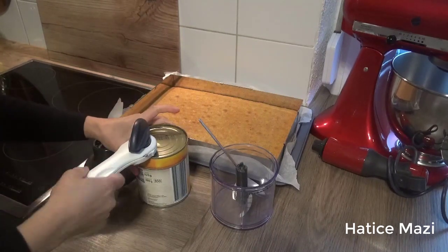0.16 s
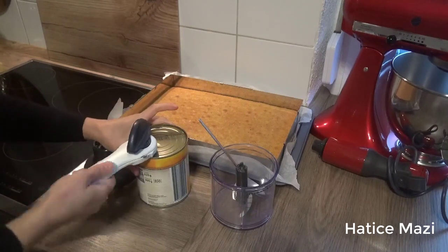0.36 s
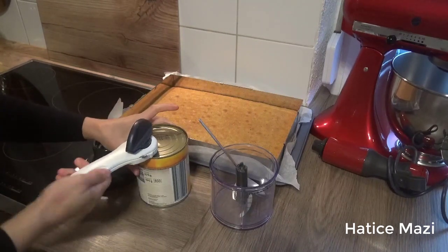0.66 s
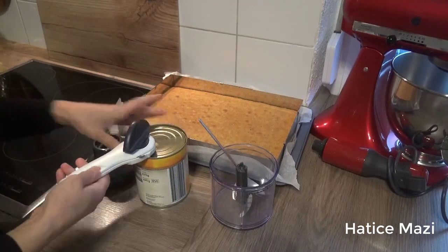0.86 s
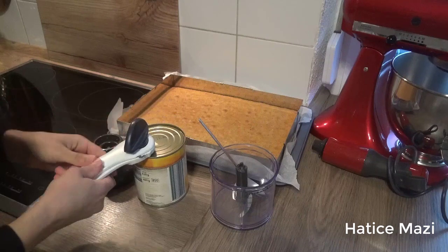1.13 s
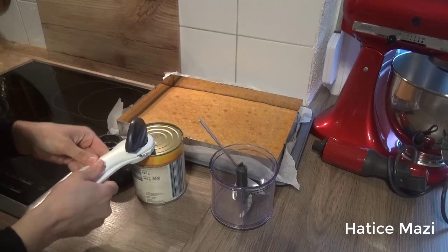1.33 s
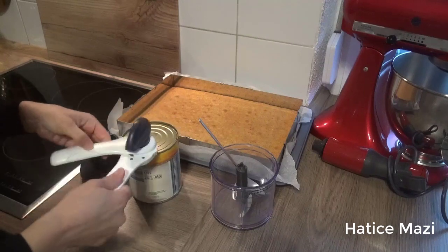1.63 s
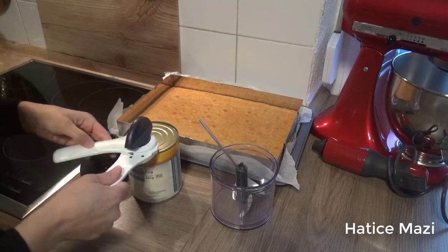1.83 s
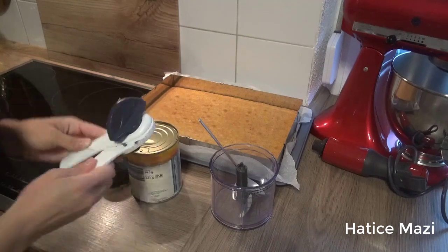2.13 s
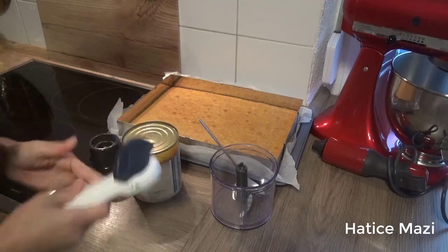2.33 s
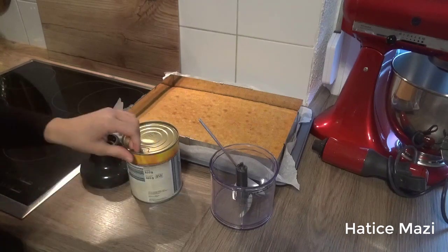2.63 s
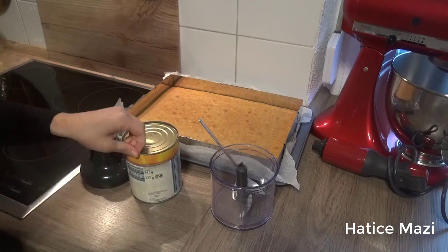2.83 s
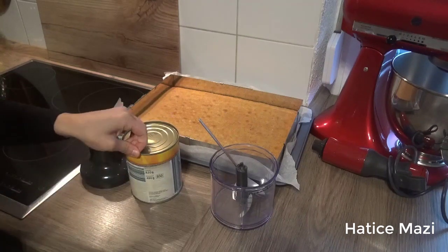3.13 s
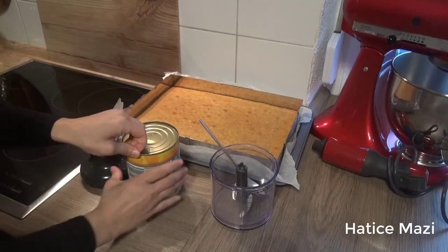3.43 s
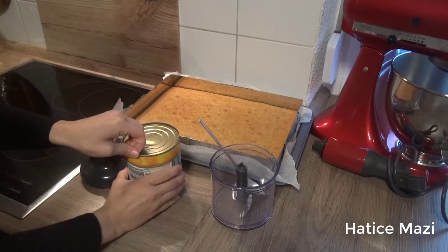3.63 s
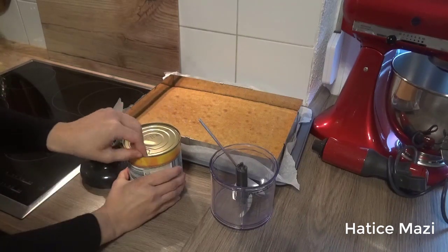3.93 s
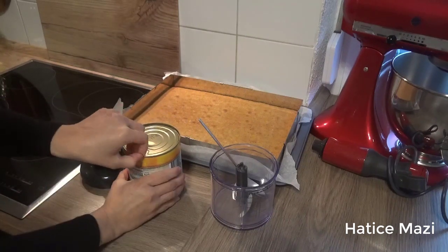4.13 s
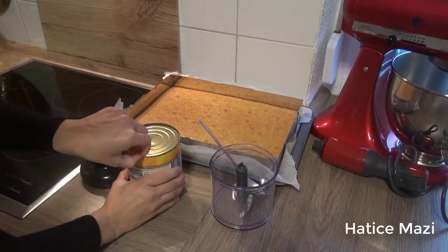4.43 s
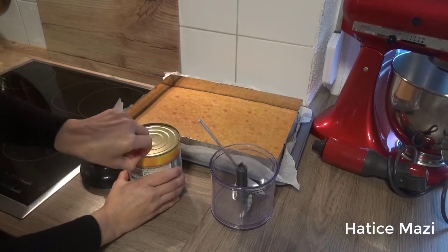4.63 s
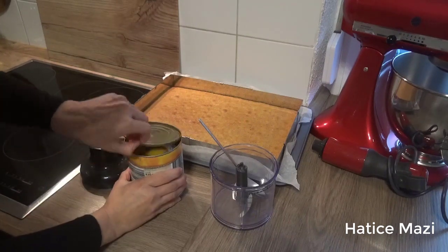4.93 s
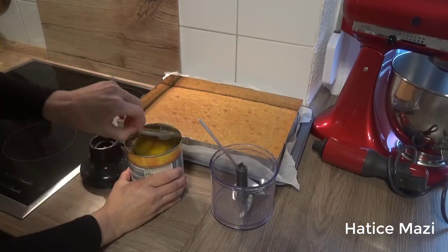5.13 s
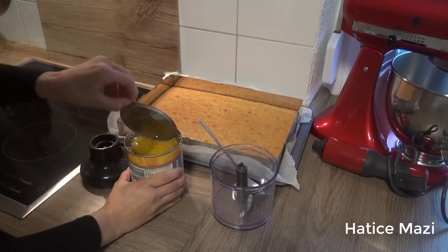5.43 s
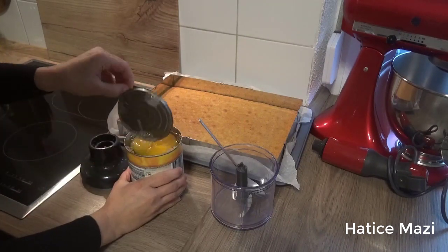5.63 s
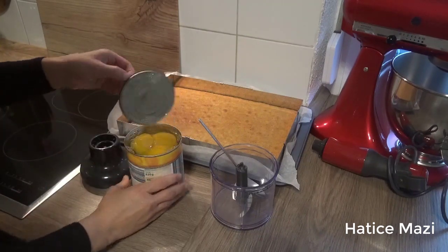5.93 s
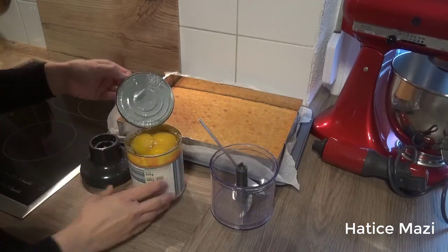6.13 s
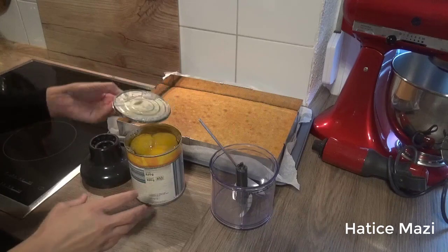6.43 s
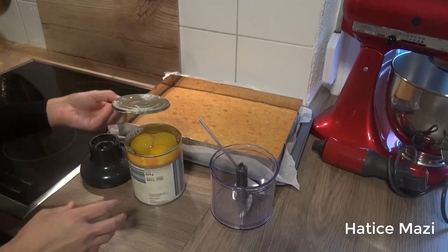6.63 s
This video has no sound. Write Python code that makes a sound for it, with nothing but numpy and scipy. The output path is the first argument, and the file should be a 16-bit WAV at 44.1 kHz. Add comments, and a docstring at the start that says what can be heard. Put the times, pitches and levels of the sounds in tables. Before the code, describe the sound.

A quiet kitchen with a soft low hush and short diffuse echo, heard close in gentle stereo. At 0.1 s a full tin thumps softly on the wooden worktop amid sleeve swishes and faint opener ticks; smaller bumps and rubbing follow around 1.0-1.1 s. From 1.45 to 1.8 s the opener is wrenched off: rapid metal knocks, a gritty scrape, brief falling squeals and a low droning shuffle. Cloth swishes at 2.1 s and handles slide at 2.3 s. A nail ticks at 2.67 s, then the opener lands loudly at 2.9 s, slightly right, with woody rebounds until 3.1 s. A soft palm bump comes at 3.6 s, then light tinny nail plucks from 3.85 to 4.2 s. At 4.75 s the lid pops dully; around 5.1 s it grazes, smacks and squeaks upward wetly. Faint thin squeaks at 5.5 s and tiny ticks fade into near silence.

```python
"""On a wooden kitchen worktop a tin is opened. A can opener makes its last turns, is wrenched off the rim
and clatters down beside it: impacts excite damped modes, and the scraping cutter sings and squeals.
Fingernails pick at the cut lid until it peels off the syrup, as modal pings, edge friction, smacks and squeaks.
Sleeves swish and the tin shuffles, both as stick-slip noise; the room adds a hush and a diffuse echo."""
import sys
import numpy as np
from scipy import signal
from scipy.fft import rfft, irfft, next_fast_len
from scipy.io import wavfile
from scipy.ndimage import uniform_filter1d

SR = 44100
rng = np.random.default_rng(int(sys.argv[2]) if len(sys.argv) > 2 else 0)


def log_audio(samples):
    """Write samples as a 16-bit WAV file to the path given in sys.argv[1]."""
    # one column per channel
    frames = np.atleast_2d(samples).T
    # limit to full scale, then quantise
    limited = np.clip(frames, -1, 1)
    pcm = np.round(limited * 32767).astype(np.int16)
    wavfile.write(sys.argv[1], SR, pcm)


N = 298557


def from_db(db):
    """Level law: decibels to amplitude gain."""
    return 10 ** (np.asarray(db) / 20)


def rms_one(x):
    """Power normalisation: scale to unit mean square."""
    return x / np.sqrt(np.mean(x ** 2) + 1e-20)


def at_hz(points, hz):
    """Logarithmic frequency scale: interpolate a table along it."""
    f, value = np.transpose(points)
    return np.interp(np.log(np.maximum(hz, 1)), np.log(f), value)


def colour(x, spectrum, share=1):
    """Minimum phase: a causal filter follows a share of a dB spectrum, by folding its cepstrum."""
    size = 2 * next_fast_len(x.shape[-1] // 2 + 2048)
    gain = from_db(share * at_hz(spectrum, np.fft.rfftfreq(size, 1 / SR)))
    cepstrum = irfft(np.log(gain))
    cepstrum[1:size // 2] *= 2
    cepstrum[size // 2 + 1:] = 0
    response = np.exp(rfft(cepstrum))
    return irfft(rfft(x, size) * response)[..., :x.shape[-1]]


def dying(t, t60):
    """Exponential decay: amplitude falls by 60 dB in t60."""
    return np.exp(-np.log(1000) * t / t60)


def rings(modes, t):
    """Modal decay: one exponentially dying sine per mode."""
    return np.array([from_db(db) * np.sin(2 * np.pi * hz * t) * dying(t, t60) for hz, db, t60 in modes])


def singing(x, modes, modes_db):
    """Forced resonance: a rubbing sound plus the modes that it keeps ringing."""
    body = rings(modes, np.arange(SR // 3) / SR).sum(axis=0)
    gain = from_db(modes_db)
    sung = rms_one(signal.fftconvolve(x, body)[:N]) * np.std(x)
    return (x + gain * sung) / np.sqrt(1 + gain ** 2)


def three_bands(x):
    """Band splitting: the thud, clack and crack ranges of a sound."""
    ranges = [(400, "low"), ([400, 2500], "band"), (2500, "high")]  # Hz
    filters = [signal.butter(3, hz, kind, fs=SR, output="sos") for hz, kind in ranges]
    return [signal.sosfilt(sos, x) for sos in filters]


BLOW_S = 0.016  # a blow's level is its energy spread over this time


def blows(rows, modes, spectrum, body_t60, body_db, modes_db, thud_db, crack_db, thud_lag_s):
    """Impact excitation: a brief crack, a dense body rattle and modes struck with random strengths."""
    t = np.arange(int(.6 * SR)) / SR
    out, tones = np.zeros(N + SR), rings(modes, t)
    for s, contact_s, db, bright_db in rows:
        strengths = from_db(rng.normal(0, 2, len(modes))) * rng.choice([-1, 1], len(modes))
        envelope = dying(t, contact_s) + from_db(body_db) * dying(t, body_t60)
        rattle = rng.standard_normal(len(t)) * envelope
        # a long, dragging contact also starts more softly
        onset = 1 - np.exp(-t / (2 * contact_s ** 2 + 1e-6))
        sound = colour(onset * (rattle + from_db(modes_db) * strengths @ tones), spectrum)
        # a brighter contact trades thud for crack; the thud answers a moment later
        weights_db = [thud_db - bright_db, 0, crack_db + bright_db]
        for band, weight_db, lag_s in zip(three_bands(sound), weights_db, [thud_lag_s, 0, 0]):
            at = round((s + lag_s) * SR)
            band_level = np.sqrt(np.sum(band ** 2) / (BLOW_S * SR))
            out[at:at + len(t)] += from_db(db + weight_db) * band / band_level
    return out[:N]


STROKE_DROP_DB = 25  # a stroke climbs this far during its swell and sinks as far during its fade


def pressure(strokes):
    """Incoherent addition: strokes swell and fade evenly in dB, and where they overlap their powers add."""
    t, power = np.arange(N) / SR, 0
    for peak_s, db, swell_s, fade_s in strokes:
        away = np.maximum((peak_s - t) / swell_s, (t - peak_s) / fade_s)
        drop_db = np.minimum(STROKE_DROP_DB * away, 100)
        power = power + from_db(db - drop_db) ** 2
    return np.sqrt(power)


def friction(strokes, spectrum, slips_per_s, spread_db, smooth_db):
    """Stick-slip friction: random tiny slips of uneven size over a smooth hiss, under the strokes' pressure."""
    sizes = from_db(spread_db * np.minimum(rng.exponential(1, N), 4)) * rng.choice([-1, 1], N)
    slips = rms_one(sizes * (rng.random(N) < slips_per_s / SR))
    hiss = from_db(smooth_db) * rng.standard_normal(N)
    return pressure(strokes) * rms_one(colour(slips + hiss, spectrum))


def squeaks(rows, waver):
    """Frequency modulation: each tone rings out while its pitch glides and wavers (waver in octaves)."""
    t = np.arange(SR // 3) / SR
    out = np.zeros(N)
    for s, hz, db, t60, rise in rows:
        at = round(s * SR)
        wobble = waver * rms_one(uniform_filter1d(rng.standard_normal(len(t)), size=120))
        phase = 2 * np.pi * np.cumsum(hz * 2 ** (rise * t + wobble)) / SR
        attack = 1 - dying(t, 0.0062)
        out[at:at + len(t)] += from_db(db) * np.sin(phase) * dying(t, t60) * attack
    return out


# spectral density of the quiet room: (frequency [Hz], relative level [dB per Hz])
AIR_COLOUR = [(20, -9.5), (50, -6.5), (110, -10.5), (180, -4.5), (280, -9.5), (450, -8.5), (900, -9),
              (1150, -12), (1450, -11.5), (2400, -19.5), (5000, -23), (11000, -29)]
AIR_DB = -62


def hush():
    """Broadband background: two independent coloured noises, one for the middle and one for the side."""
    return from_db(AIR_DB) * rms_one(colour(rng.standard_normal((2, N)), AIR_COLOUR))


# reverberation time of the room: (frequency [Hz], t60 [s])
ROOM_DECAY = [(80, 0.7), (250, 0.57), (700, 0.46), (2000, 0.36), (5000, 0.33), (11000, 0.28)]


def room_tail(build_s):
    """Diffuse reverberation: noise of unit energy builds up, then dies at each band's own rate."""
    t = np.arange(int(.9 * SR)) / SR
    white, hz = rfft(rng.standard_normal(len(t))), np.fft.rfftfreq(len(t), 1 / SR)
    edges = [0, 150, 400, 1000, 2500, 6000, SR]  # Hz
    tail = np.zeros(len(t))
    for lo, hi in zip(edges, edges[1:]):
        band = irfft(white * ((hz >= lo) & (hz < hi)), len(t))
        tail += band * dying(t, at_hz(ROOM_DECAY, min((lo + hi) / 2, 2 * lo + 100)))
    tail = tail * (1 - np.exp(-t / build_s))
    return tail / np.sqrt(np.sum(tail ** 2))


def even_room(echo_db):
    """Spectral equalisation: direct sound and echoes together favour no broad range of pitch."""
    response = from_db(echo_db) * room_tail(0.00067)
    response[0] += 1
    hz = np.fft.rfftfreq(len(response), 1 / SR)
    power = uniform_filter1d(np.abs(rfft(response)) ** 2, size=25)
    correction_db = -10 * np.log10(power / power.mean())
    return colour(response, np.column_stack([hz, correction_db])[1:])


# spread of echoes and hush between the ears: (frequency [Hz], side gain before its offsets [dB])
SIDE_COLOUR = [(60, -28.5), (160, -24), (500, -19.5), (2000, -21.5), (5000, -16), (10000, -13.5)]
# the opener lands a little to the right: (frequency [Hz], left minus right [dB])
LANDING_LEAN = [(80, 3), (200, .3), (350, -1.2), (630, -2.7), (1100, -2.6), (2200, -1.8), (4000, -1),
                (9000, -.7)]
# the hush comes more from the right: (frequency [Hz], left minus right [dB])
HUSH_BALANCE = [(60, -3), (170, -7.5), (500, 1), (1400, -7.5), (4000, 0), (11000, -2.5)]


def kitchen(at_tin, beside_tin, echo_db, side_db, hush_side_db):
    """Level-difference stereophony: tin ahead, landing and hush to the right, echoes unlike at each ear."""
    hush_mid, hush_side = hush()
    room = even_room(echo_db)
    ahead, beside = [signal.fftconvolve(x, room)[:N] for x in (at_tin, beside_tin)]
    echoes = signal.fftconvolve(at_tin + beside_tin, room_tail(0.00033))[:N]
    side = colour(from_db(side_db) * echoes + from_db(hush_side_db) * hush_side, SIDE_COLOUR)
    ears = []
    for sign in (1, -1):  # left, right
        leaning = colour(beside, LANDING_LEAN, sign / 2) + colour(hush_mid, HUSH_BALANCE, sign / 2)
        ears.append(ahead + leaning + sign * side)
    return np.array(ears)


# sleeves and skin sliding: (peak time [s], level [dB], swell [s], fade [s])
SWISH_STROKES = [(.11, -57.5, 0.27, 0.38), (.33, -57, 0.19, 0.33), (.655, -61, 0.05, .35),
                 (.84, -57, 0.18, .2), (1.13, -55.5, 0.32, 0.83), (1.33, -59.5, .2, .32),
                 (2.1, -53, 0.096, 0.39), (2.56, -64, 0.081, 0.33), (3.575, -59, 0.12, 0.14),
                 (3.84, -66.5, 0.14, 1.1), (6.0, -73, 1, 1.2)]
# colour of sliding cloth: (frequency [Hz], relative gain [dB])
CLOTH_COLOUR = [(200, -10), (1000, -11), (3000, 2.5), (5000, -2.5), (9000, 1), (11000, -4.5)]


def sleeves():
    """Cloth friction: dense small slips under a strong hiss."""
    return friction(SWISH_STROKES, CLOTH_COLOUR, slips_per_s=330, spread_db=3.0, smooth_db=5.0)


# a hand settles round the tin with a soft bump: (peak time [s], level [dB], swell [s], fade [s])
PALM_STROKES = [(3.625, -45, 0.078, 0.15)]
# colour of the palm's bump: (frequency [Hz], relative gain [dB])
PALM_COLOUR = [(15, -11), (35, 4.5), (65, -1), (100, -14), (150, -5.5), (230, -30), (1000, -61)]


def palm_bump():
    """Soft contact: friction noise held to the bass swells and fades once."""
    return friction(PALM_STROKES, PALM_COLOUR, slips_per_s=200, spread_db=2, smooth_db=0)


# the tin rocks back on to its base: (time [s], level [dB])
TIN_ROCKINGS = [(.108, -31), (0.983, -45), (1.137, -35.5)]
# low modes of the worktop under the tin: (frequency [Hz], relative level [dB], t60 [s])
BOARD_RESONANCES = [(93, -5, 0.25), (156.6, -10, 0.14), (312, -27, 0.06), (540, -42, .08)]


def rocking(attack_s):
    """Modal excitation: the full tin's weight softly sets the worktop's low modes booming."""
    t = np.arange(SR // 2) / SR
    boom = rings(BOARD_RESONANCES, t).sum(axis=0) * (1 - np.exp(-t / attack_s))
    out = np.zeros(N)
    for s, db in TIN_ROCKINGS:
        at = round(s * SR)
        out[at:at + len(t)] += from_db(db) * boom
    return out


# the tin shuffling on the worktop: (peak time [s], level [dB], swell [s], fade [s])
SHUFFLE_STROKES = [(.03, -55, 0.17, 0.19), (.135, -41.5, 0.13, 0.047), (.56, -59.5, 0.76, 0.34),
                   (.84, -54.5, 0.18, 0.25), (1.0, -49.5, 0.047, 0.044), (1.14, -46, 0.14, 0.25),
                   (1.38, -74, 0.089, 0.17), (1.53, -34, 0.1, 0.088), (1.73, -41, 0.16, 0.14),
                   (2.78, -60, 0.6, 0.19), (4.8, -46, 0.02, 0.18), (5.54, -57.5, .03, 0.072)]
# colour of the tin rubbing on wood: (frequency [Hz], relative gain [dB])
WOOD_RUB_COLOUR = [(30, -27), (65, -10), (90, -2.5), (120, 1.5), (160, 2.5), (300, 2), (600, -2.5),
                   (1300, -9), (2500, -17), (6000, -24.5), (11000, -61)]


def shuffle():
    """Friction-driven resonance: the tin rubs on wood and makes the worktop drone."""
    rub = friction(SHUFFLE_STROKES, WOOD_RUB_COLOUR, slips_per_s=260, spread_db=1.5, smooth_db=1)
    return singing(rub, BOARD_RESONANCES, modes_db=-7.0)


# the opener's gear and fingers on metal: (time [s], contact length [s], level [dB], brightness [dB])
METAL_TICKS = [(0.012, 0.014, -57, -3), (0.041, 0.014, -56.5, -1.5), (0.062, .012, -71, -7),
               (0.312, 0.096, -61.5, 11.5), (0.332, 0.02, -66, 12), (0.560, 0.032, -66, 2),
               (0.808, 0.027, -55.5, 9), (0.830, 0.009, -59, 13), (0.957, 0.0056, -65, 9.5),
               (1.051, 0.0065, -61, 4), (1.092, 0.039, -48.5, -5.5), (2.2185, 0.017, -57.5, 5.5),
               (3.550, 0.047, -56.5, 4), (5.050, 0.018, -59, -7.5), (5.561, 0.03, -73, 10.5),
               (5.833, 0.015, -61, -6.5), (5.891, .03, -64, -4), (6.592, 0.0076, -72, 13)]
# modes of the tin: (frequency [Hz], relative level [dB], t60 [s])
TIN_RESONANCES = [(91.6, -5, 0.13), (165, 1, 0.16), (276, 5.5, 0.057), (580, -2, 0.068), (822, -16, 0.13),
                  (1345, -5.5, 0.048), (1470, -42, 0.014), (4400, -9, 0.063), (8500, -27, .1)]
# colour of a light contact: (frequency [Hz], relative gain [dB])
LIGHT_COLOUR = [(40, -56), (100, -2), (600, -4), (1500, -3.5), (3000, -4), (6000, 2), (11000, 3.5)]


def ticks():
    """Light impact: quiet contacts stir the modes of the tin."""
    return blows(METAL_TICKS, TIN_RESONANCES, LIGHT_COLOUR, body_t60=0.059, body_db=-10.5,
                 modes_db=-7.5, thud_db=-13.5, crack_db=2, thud_lag_s=0.00293)


# opener and tin knocking together: (time [s], contact length [s], level [dB], brightness [dB])
TOOL_KNOCKS = [(0.096, 0.023, -36, -3), (1.506, 0.025, -31.5, 2.5), (1.572, .06, -39, 2),
               (1.596, 0.018, -33.5, 2.5), (1.642, 0.044, -36.5, -1), (1.691, 0.011, -38, 21),
               (1.700, 0.028, -38, -7.5), (1.7905, 0.0042, -41.5, 3)]
# colour of a hard contact: (frequency [Hz], relative gain [dB])
HARD_COLOUR = [(30, -56), (65, -41), (92, -4.5), (200, -11), (600, 3.5), (1300, 3.5), (1900, -4),
               (2900, -11), (4000, -12), (7000, -16.5), (11000, -22)]


def knocks():
    """Hard impact: the opener strikes the tin, and its thud lags."""
    return blows(TOOL_KNOCKS, TIN_RESONANCES, HARD_COLOUR, body_t60=0.13, body_db=-2,
                 modes_db=-9, thud_db=-4.5, crack_db=-16.5, thud_lag_s=0.00828)


# the cutter scrapes out of the rim, then the handles slide shut:
# (peak time [s], level [dB], swell [s], fade [s])
SCRAPE_STROKES = [(1.463, -40, 0.019, 0.058), (1.487, -39, 0.025, 0.056), (1.58, -47, 0.077, 0.29),
                  (2.18, -54.5, 0.086, 0.3), (2.285, -40, 0.082, 0.057), (2.36, -56.5, .1, 0.17)]
# colour of the scraping cutter: (frequency [Hz], relative gain [dB])
CUTTER_COLOUR = [(200, 1), (700, -1.5), (1500, 6.5), (3300, 7), (4500, 5), (6500, 2.5), (11000, -1.5)]
# cutter wheel and its steel bracket: (frequency [Hz], relative level [dB], t60 [s])
CUTTER_RESONANCES = [(2600, -22, 0.052), (2970, 17.5, 0.074), (3440, 12, 0.051), (4310, 14, 0.079),
                     (4920, 3, 0.038), (6100, 13, 0.047), (8200, -9, 0.017)]


def scraping():
    """Friction-driven resonance: slips along the rim set the steel parts singing."""
    slips = friction(SCRAPE_STROKES, CUTTER_COLOUR, slips_per_s=600, spread_db=4, smooth_db=4)
    return singing(slips, CUTTER_RESONANCES, modes_db=-12.5)


# the cutter squeals ever lower as it is levered off:
# (time [s], starting frequency [Hz], level [dB], t60 [s], rise [octaves per s])
SQUEAL_TONES = [(1.457, 3480, -44, .06, -1), (1.477, 3350, -40, 0.11, -2),
                (1.572, 3040, -34.5, 0.067, -2.2)]


def opener():
    """Superposition: the tool ticks, knocks against the tin, then scrapes and squeals free."""
    return ticks() + knocks() + scraping() + squeaks(SQUEAL_TONES, waver=0.032)


# the opener touches the worktop, lands, rocks, and its handle drops:
# (time [s], contact length [s], level [dB], brightness [dB])
OPENER_LANDINGS = [(2.892, 0.049, -38, 0), (2.9035, 0.015, -15, -0.5), (2.912, 0.058, -23, -2),
                   (2.977, 0.026, -40, -13.5), (3.050, 0.06, -25.5, -2), (3.0712, 0.0097, -22, 3.5),
                   (3.077, 0.043, -31.5, 9)]
# modes of the struck worktop: (frequency [Hz], relative level [dB], t60 [s])
WORKTOP_RESONANCES = [(94.6, 6, 0.4), (204.3, -10.5, 0.36), (305, -2, 0.14), (335.5, -16, 0.24),
                      (450, -15.5, 0.32), (500.3, -8.5, 0.65), (553, -7.5, 0.4), (637, -21.5, 0.18),
                      (676, -4.5, 0.35), (789, 1.5, 0.14), (850, -4, 0.12), (940, -5, 0.23),
                      (980, -5.5, 0.44), (1095, -8, 0.21), (1380, -6, 0.26), (1572, -1.5, 0.14),
                      (4920, 20, 0.028), (5090, 16, 0.027), (5400, 12, 0.032), (8640, 14, 0.04)]
# colour of a heavy contact: (frequency [Hz], relative gain [dB])
HEAVY_COLOUR = [(30, -25), (65, -24.5), (92, -10.5), (150, 2.5), (220, 11.5), (450, 8), (850, 9.5),
                (1300, -3), (2200, -22), (4000, -37), (7000, -44.5), (11000, -55)]


def landing():
    """Heavy impact: the tool put down hard excites the modes of the wood."""
    return blows(OPENER_LANDINGS, WORKTOP_RESONANCES, HEAVY_COLOUR, body_t60=0.32, body_db=-10,
                 modes_db=-24.0, thud_db=-4.5, crack_db=-9.5, thud_lag_s=0.0012)


# fingernails plucking the lid's edge: (time [s], contact length [s], level [dB], brightness [dB])
NAIL_PLUCKS = [(2.667, 0.013, -38, -6), (2.802, 0.02, -57.5, 3.5), (3.848, 0.055, -53.5, 3),
               (3.887, 0.019, -50, 6), (3.954, 0.046, -49.5, 3), (4.065, 0.047, -43.5, 2.5),
               (4.087, 0.048, -54.5, 12), (4.178, 0.0093, -46.5, 11.5), (4.754, 0.073, -38, -12),
               (4.817, 0.048, -46.5, -1), (5.323, 0.04, -56.5, 1)]
# modes of the lid: (frequency [Hz], relative level [dB], t60 [s])
LID_RESONANCES = [(561, 7.5, 0.087), (615, 5, 0.12), (1223, -8, 0.15), (1374, 5, 0.085),
                  (1940, 10.5, 0.031), (2773, 7.5, 0.037), (3170, -19, 0.3), (3525, -3.5, 0.091),
                  (4245, -13, 0.091), (4420, -17, 0.22), (6040, -3, 0.059), (6840, -11, 0.21),
                  (7500, -12, 0.136), (8900, 0, 0.047), (9900, 3, 0.082), (9900, -19, 0.088)]
# colour of a pinging contact: (frequency [Hz], relative gain [dB])
PINGY_COLOUR = [(40, -27), (100, 10), (570, 13.5), (900, 5.5), (1400, 7.5), (2300, -4.5), (2900, -4),
                (4000, -5), (5300, -10), (8500, -6), (11000, -21.5)]


def plucks():
    """Plate vibration: nails excite the modes of the thin steel disc."""
    return blows(NAIL_PLUCKS, LID_RESONANCES, PINGY_COLOUR, body_t60=0.093, body_db=3.0,
                 modes_db=-7.5, thud_db=-13.0, crack_db=-9.5, thud_lag_s=0.00288)


# syrup letting go of the lid: (time [s], contact length [s], level [dB], brightness [dB])
SYRUP_SMACKS = [(4.330, 0.032, -52, -20.5), (4.926, 0.018, -51.5, -5), (4.964, 0.026, -57, -6),
                (5.108, 0.024, -53.5, 12), (5.133, .03, -72, 2), (5.198, 0.021, -66.5, 20)]
# modes heard as the lid leaves the syrup: (frequency [Hz], relative level [dB], t60 [s])
SYRUP_RESONANCES = [(537, 0, 0.069), (1133, 0.5, 0.04), (1560, 5, 0.02), (1790, 1, 0.034),
                    (2070, 7.5, 0.031), (3650, 7.5, 0.023), (4870, -9, .025)]


def smacks():
    """Adhesive release: each letting go is a burst that rings short modes."""
    return blows(SYRUP_SMACKS, SYRUP_RESONANCES, HARD_COLOUR, body_t60=0.22, body_db=1.5,
                 modes_db=-1.5, thud_db=-19, crack_db=-14, thud_lag_s=0.0034)


# the lid's cut edge grazing the rim as it lifts: (peak time [s], level [dB], swell [s], fade [s])
PEEL_STROKES = [(4.78, -65, 0.071, 0.38), (4.95, -66, .1, 0.12), (5.06, -55.5, .02, 0.097),
                (5.125, -50, 0.049, .1), (5.34, -63.5, 0.027, .06), (5.83, -81, 0.036, 0.17)]
# colour of the grazing lid: (frequency [Hz], relative gain [dB])
GRAZE_COLOUR = [(100, -7), (500, -12), (1200, -1.5), (2100, -6), (2600, -5), (3500, -16), (6000, -18),
                (11000, -24)]


def peel():
    """Friction-driven resonance: the grazing edge keeps the syrup modes ringing."""
    graze = friction(PEEL_STROKES, GRAZE_COLOUR, slips_per_s=290, spread_db=9, smooth_db=5.0)
    return singing(graze, SYRUP_RESONANCES, modes_db=2.5)


# squeaks and pips of the wet lid:
# (time [s], starting frequency [Hz], level [dB], t60 [s], rise [octaves per s])
WET_SQUEAKS = [(4.335, 1440, -48, 0.029, 2.7), (5.116, 1604, -44, 0.13, 1.9), (5.17, 1720, -48, 0.066, 4.7),
               (5.180, 2300, -54, 0.05, 4), (5.481, 3230, -59.5, 0.13, 0.13),
               (5.563, 3590, -59, 0.26, 0.079)]


def lid():
    """Superposition: the disc pings, grazes the rim, smacks off the syrup and squeaks."""
    return plucks() + peel() + smacks() + squeaks(WET_SQUEAKS, waver=0.01)


def scene():
    """Superposition: all sources at the tin add up, and the landing beside it is placed apart."""
    hands = sleeves() + shuffle() + palm_bump()
    at_tin = opener() + lid() + hands + rocking(attack_s=0.0027)
    return kitchen(at_tin, landing(), echo_db=-5.5, side_db=3.5, hush_side_db=10)


CUTOFF_HZ = 11150


def record(dry):
    """Low-pass filtering: a steep elliptic filter cuts the top."""
    steep = signal.ellip(12, .1, 80, CUTOFF_HZ, fs=SR, output="sos")  # ripple .1 dB, stopband 80 dB down
    return signal.sosfilt(steep, dry)


dry = scene()
out = record(dry)
log_audio(out)
```